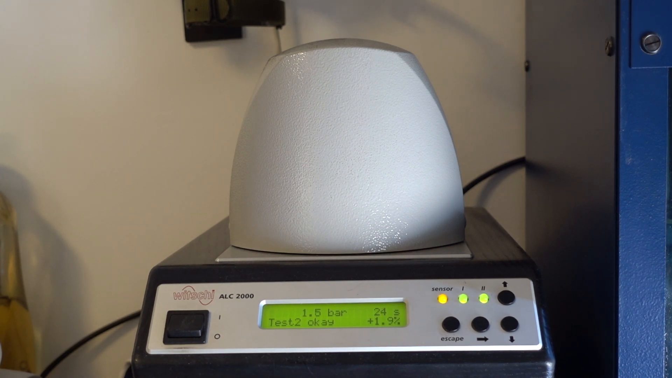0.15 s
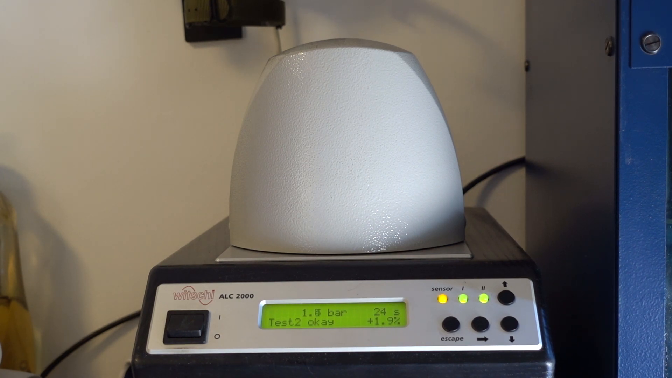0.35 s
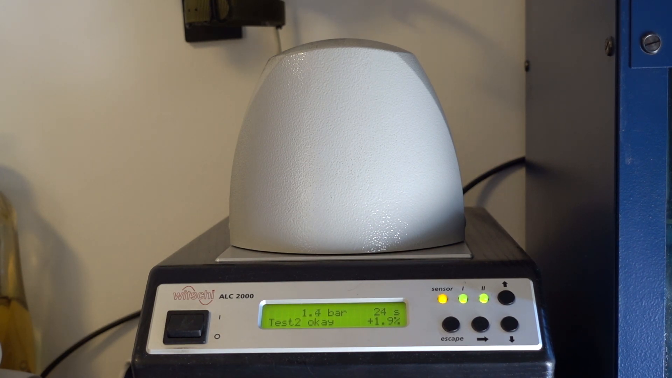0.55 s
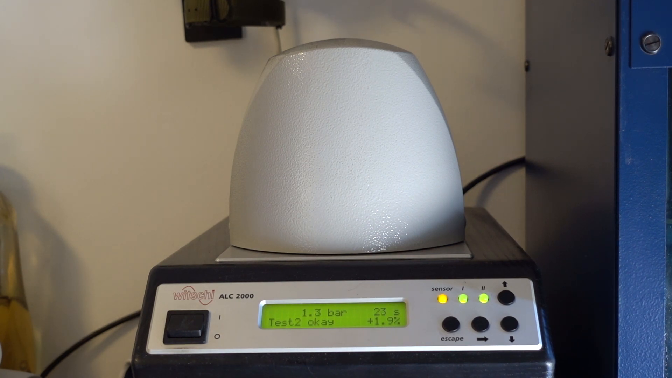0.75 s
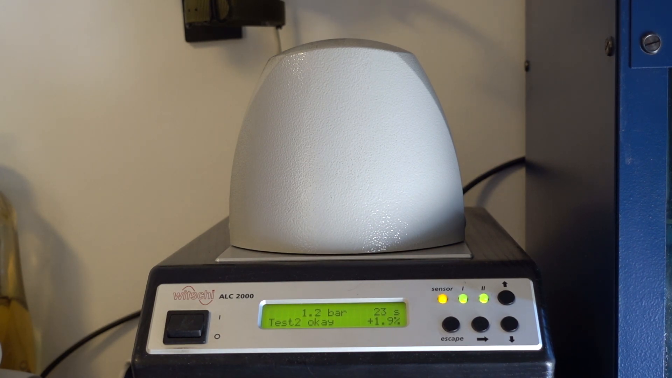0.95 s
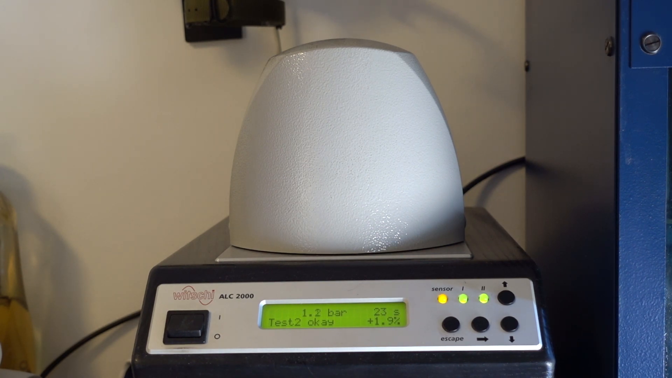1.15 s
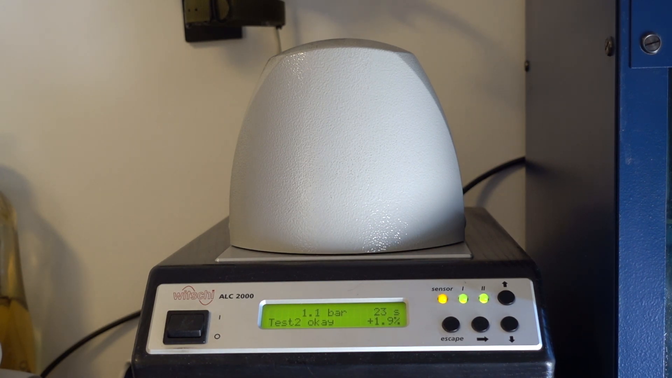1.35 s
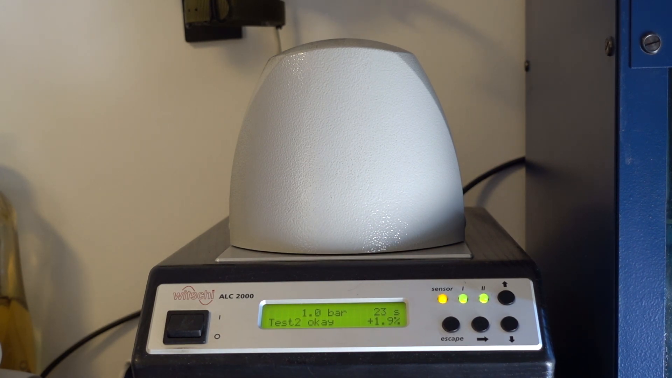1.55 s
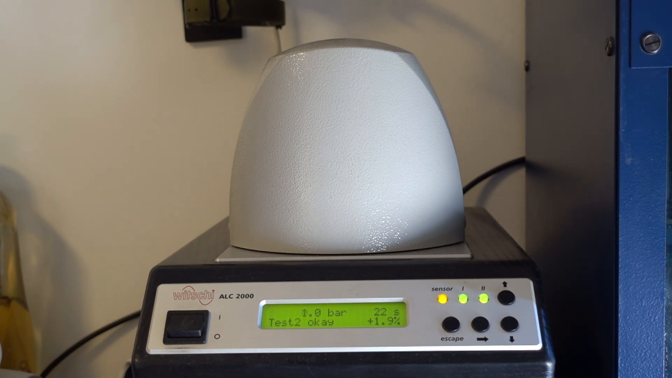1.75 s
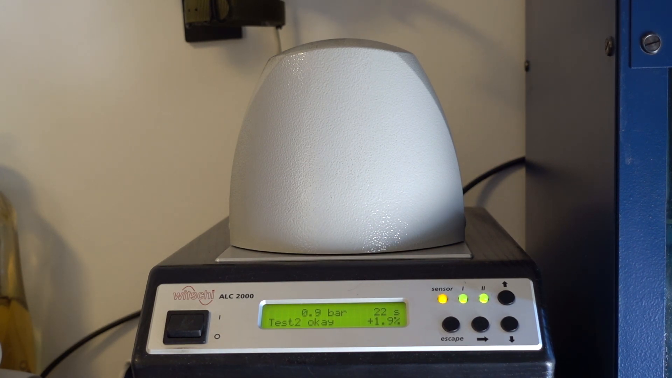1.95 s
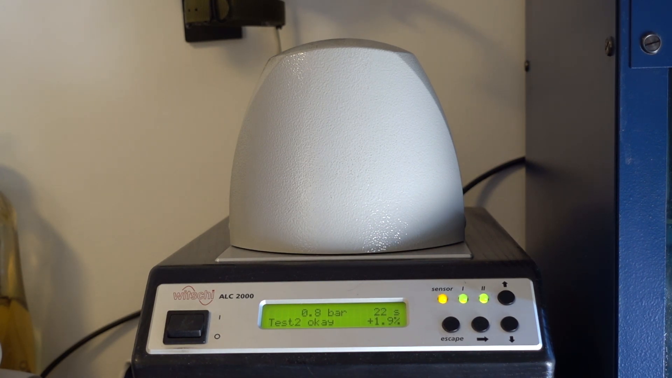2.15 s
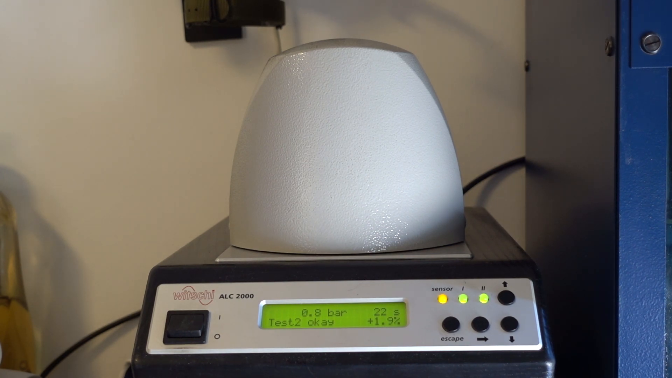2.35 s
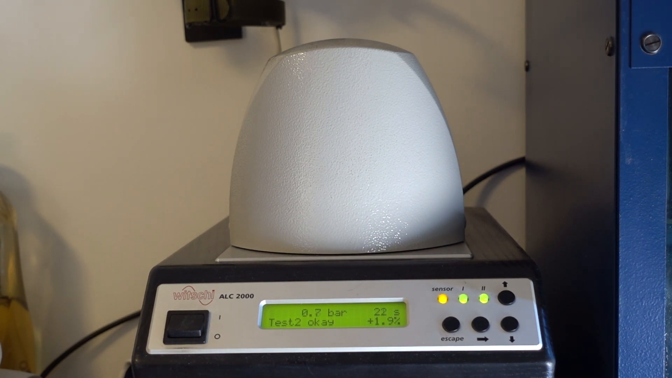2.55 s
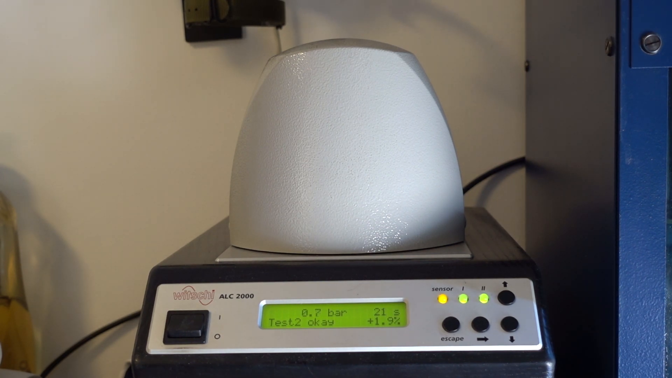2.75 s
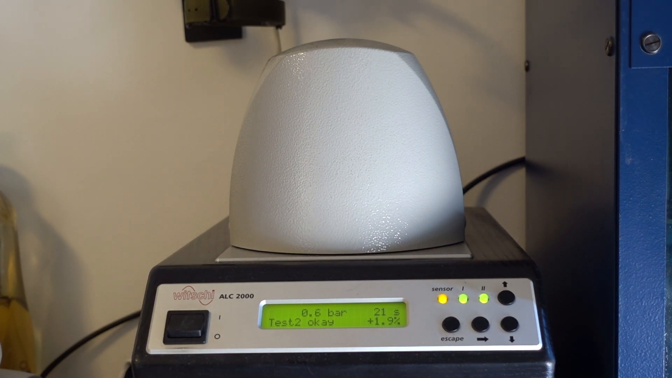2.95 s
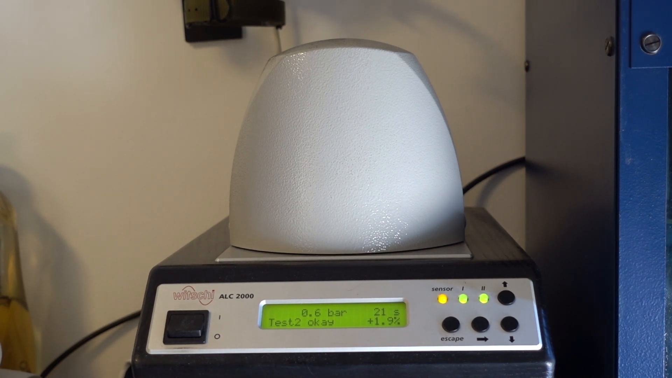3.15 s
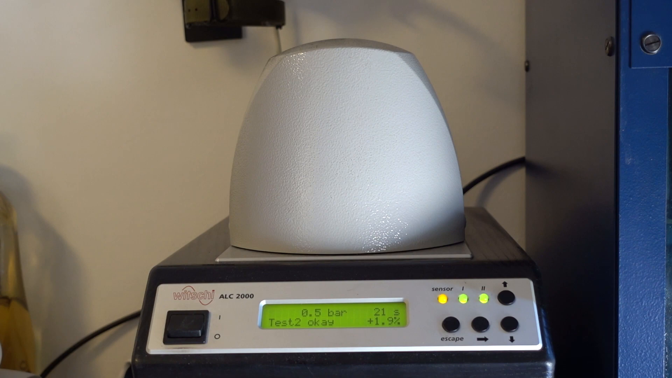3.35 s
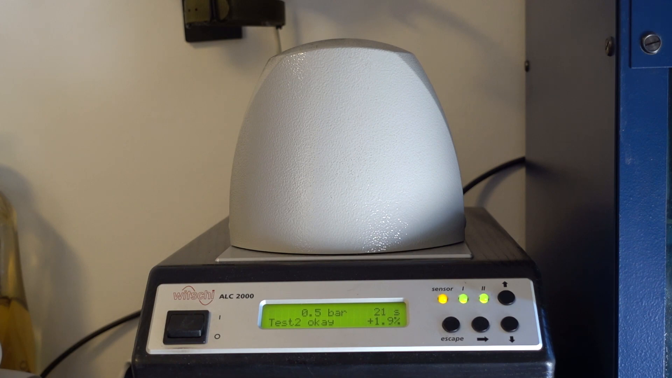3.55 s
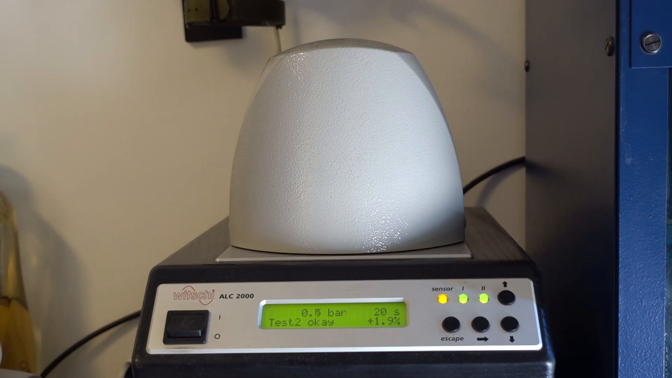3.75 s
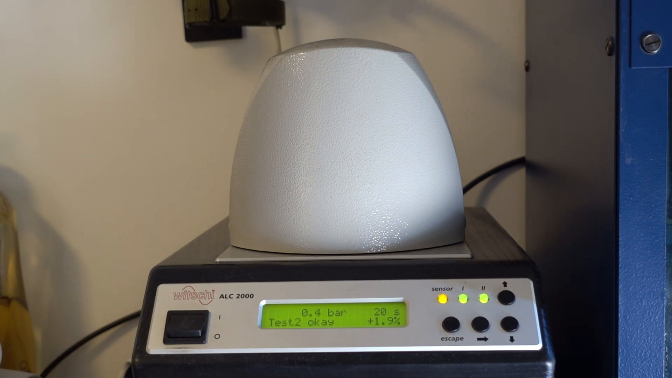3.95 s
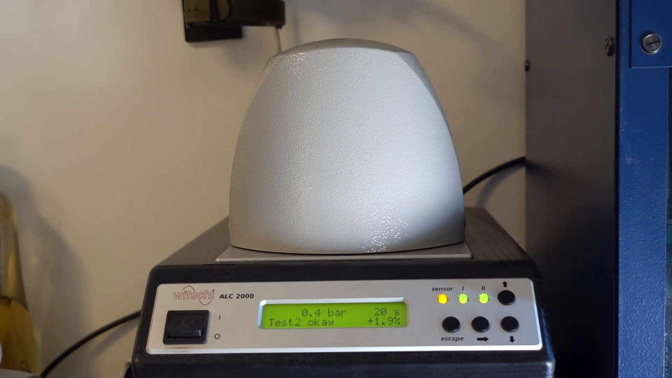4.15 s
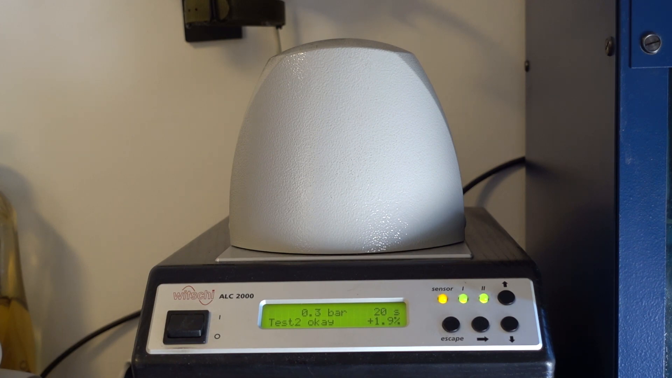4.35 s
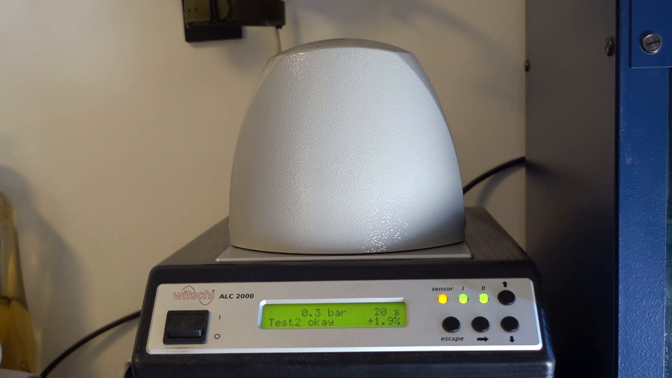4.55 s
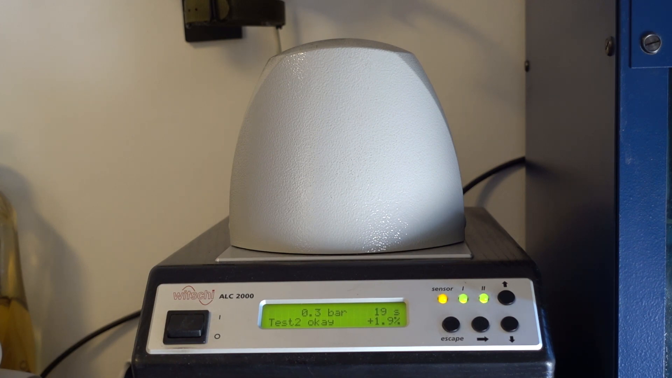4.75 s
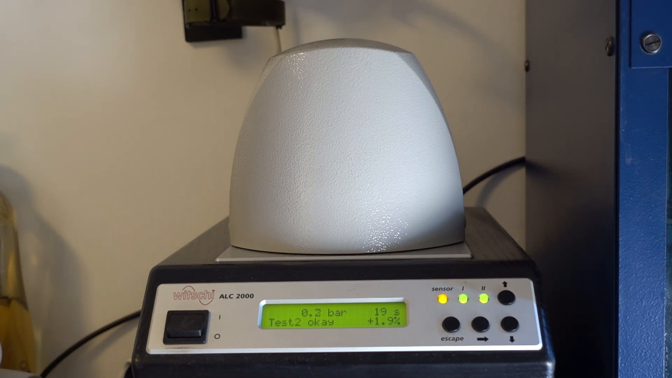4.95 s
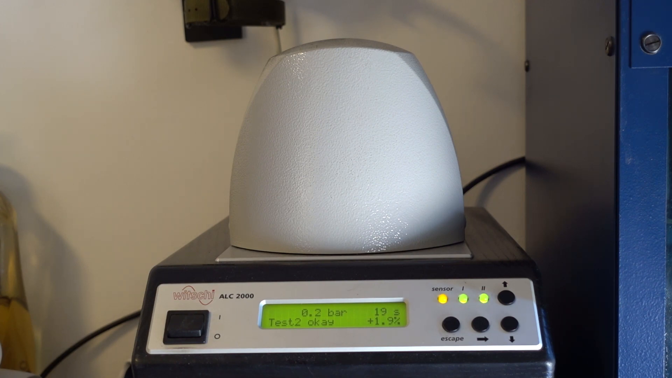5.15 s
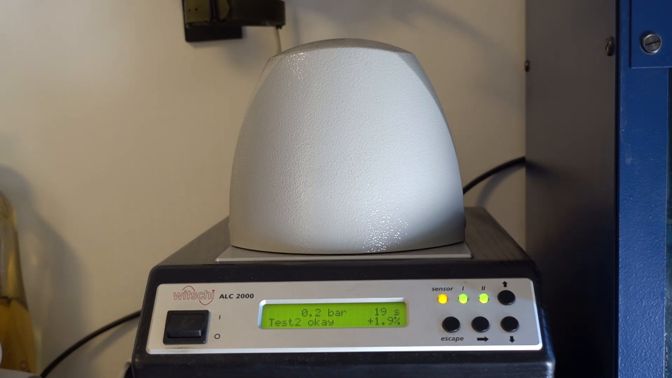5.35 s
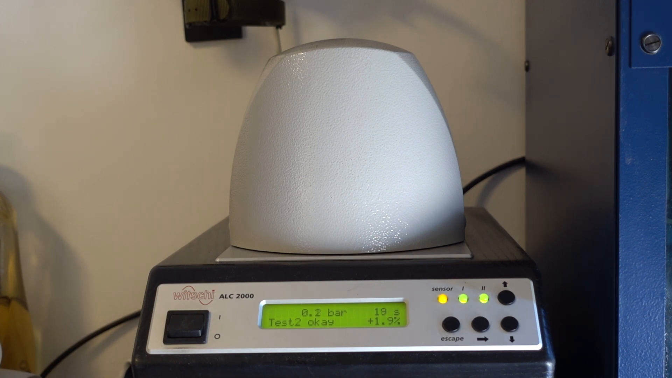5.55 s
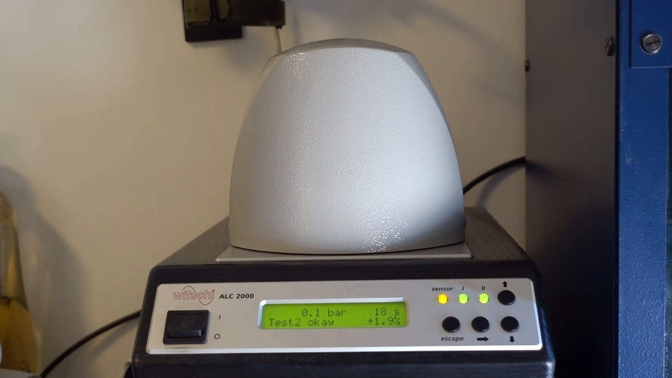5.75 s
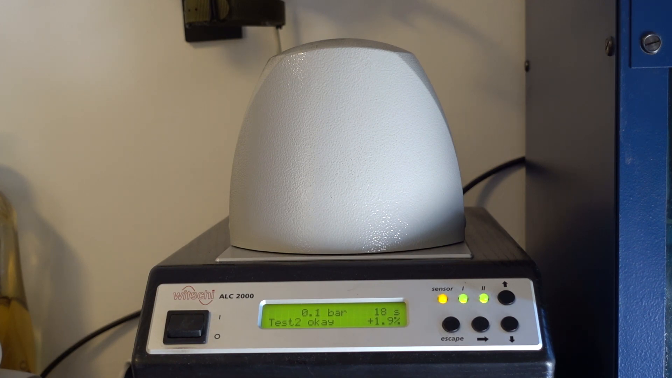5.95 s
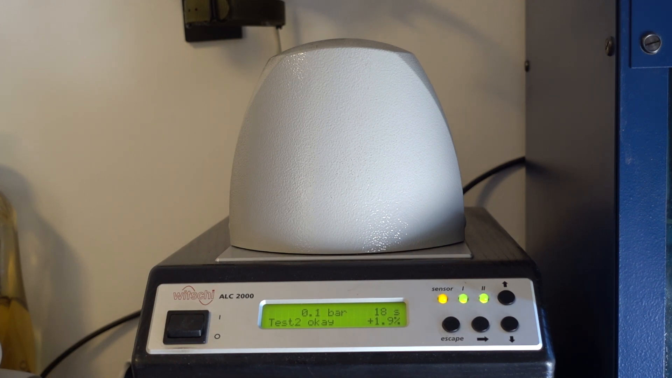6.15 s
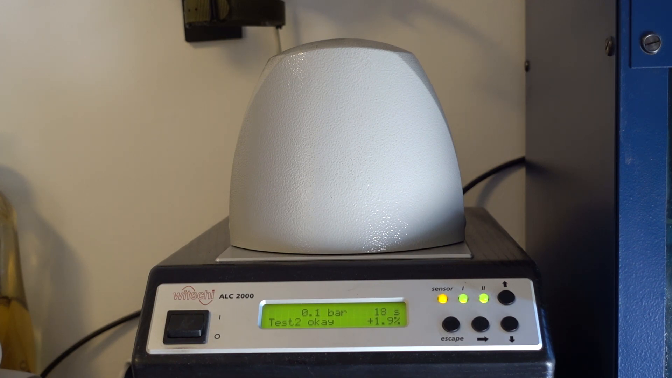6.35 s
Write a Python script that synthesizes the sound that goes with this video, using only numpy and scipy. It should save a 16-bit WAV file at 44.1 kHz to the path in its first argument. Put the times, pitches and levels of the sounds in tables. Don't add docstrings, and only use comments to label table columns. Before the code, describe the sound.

A steady, coloured jet of venting air fills the foreground in a small indoor workshop, heard in close stereo. Soft distant steps are nearly buried under it. Around halfway, a heavier step, a sole scuffing the floor, a short low squeak and brushing cloth. The jet loses its roar and thins away, uncovering harder wooden footfalls and faint room rumble, before one sharp valve click with a tiny rattle.

```python
import sys
import numpy as np
from scipy import signal
from scipy.fft import rfft, irfft, next_fast_len
from scipy.io import wavfile

SR = 44100
rng = np.random.default_rng(int(sys.argv[2]) if len(sys.argv) > 2 else 0)


def wav_out(sig):
    wavfile.write(sys.argv[1], SR, np.round(np.clip(np.atleast_2d(sig).T, -1, 1) * 32767).astype(np.int16))


def how_loud(loudness_db):
    steps = np.asarray(loudness_db, float) / 20
    return 10 ** steps


N = 286605
SIZE = next_fast_len(N + SR)
HZ = np.maximum(np.fft.rfftfreq(SIZE, 1 / SR), 1)
TIME = np.arange(N) / SR

# (time [s], level [dB])
JET_LEVEL = [
    (0, -33),
    (1, -33),
    (2, -34),
    (3.1, -35),
    (3.7, -37.5),
    (4.3, -40),
    (5.2, -46.5),
    (5.8, -51),
    (6.5, -56.5),
]
# (frequency [Hz], low share [dB/dB], hiss share [dB/dB])
JET_BANDS = [(300, 0.38, 0.46), (726, 1.7, 0.38), (1400, 1.3, 0.42), (1920, 1.14, 0.0), (2460, 0.0, 0.13),
             (3270, 0.021, 0.62), (4560, 0.44, 1.84), (7120, 0.71, 0.83), (9500, 0.0, 0.77),
             (13000, 0.0, 0.87)]
# (frequency [Hz], level [dB])
JET_REACH = [(100, -42), (250, -16), (400, -6.5), (490, 0.5), (14000, 0), (15000, -9.5), (15600, -30)]
# (frequency [Hz], width [Hz], level [dB], left minus right
# [dB])
HOUSING_MODES = [(503.6, 47, -15.5, -2.5), (588, 134, -15.5, -1), (659.6, 36, -12, -1.5), (717, 40, -15, 1),
                 (916, 82, -10, -1.5), (1026, 77, -24.5, 16), (1246, 16.6, -12.5, -10.5),
                 (1330, 37, -18, 10), (1399, 98, -7, 0.5), (1518, 83, -5, -2), (1594, 12.3, -7.5, -25),
                 (1674, 40, -2.5, -1), (1747.5, 23, -1.9, 12), (1789, 24, -4, -11.5), (1889, 59, 2.5, -3),
                 (2050, 98, -3, -4.5), (2338, 143, 4, -2), (2412, 25, -5, 18.5), (2511, 90, 1.4, -5.5),
                 (2520, 16, 5.5, 10), (2713, 83, 4.5, -2.5), (2730, 84, -10.5, -8), (2970, 85, -7, 0),
                 (3133, 78, -2, 9), (3257, 41, -6.5, 16.5), (3366, 64, -4, -8), (3530, 26, -12.5, -3),
                 (3590, 85, -26, -8), (3710, 140, -10.5, -6), (3904, 95, -35, 0),
                 (980, 22, -19, -3), (1423, 14, -6.5, -13.5), (1529, 21, -1.5, 4.5), (2050, 18, -1, 1),
               (2300, 25, -7, -4), (2241, 26, 3, -2), (2340, 36, 1, 6), (2490, 14, -7, 3), (2842, 21, 0, 1),
               (3043, 22, -5, 8), (3140, 22, -7, 4), (3050, 22, -10, 8), (3660, 34, -8.5, -2),
               (3780, 20, -17, -4)]
# (frequency [Hz], width [Hz], level [dB], left minus right [dB])
OUTLET_MODES = [(4360, 750, -10.5, 1), (4730, 58, -8.5, 2), (5030, 370, -13, 3.5), (5380, 135, -10, -1.6),
                (5430, 130, -14, -0.5), (5720, 78, -14, 1), (6010, 620, -9.5, -0.8), (6400, 100, -15, 14),
                (6690, 136, -11, 8), (6960, 320, -13, -5), (7260, 340, -15.5, 4.5), (7440, 212, -22.0, -4),
                (7930, 74, -16.5, 7), (8060, 340, -16, 0), (8500, 250, -14.5, 0), (8855, 117, -30, 7),
                (9120, 510, -22, -1), (9541, 173, -21, 0), (9940, 200, -21, -12), (10680, 610, -15, 3),
                (10930, 72, -8, 2.5), (11550, 470, -18.5, 6), (12270, 207, -24.5, 1.2),
                (11800, 113, -19, 7), (12318, 347, -23, 6), (12670, 236, -14.5, -6), (12962, 45, -31, -4),
                (13500, 591, -14.5, 4), (13814, 185, -22, 6), (14500, 1300, -18.5, -9)]
# (frequency [Hz], power common to both ears [0-1], power that differs [0-1])
WALL_SHARE = [(100, .005, .02), (200, .005, .003), (400, .005, .018), (700, .004, .04), (1300, .003, .065),
              (2400, .003, .075), (3300, .04, .22), (4400, .25, .36), (9000, .22, .36), (12500, .06, .37),
              (15000, .12, .4)]
# (frequency [Hz], density [dB per Hz])
ROOM_TONE = [(30, -50), (70, -41), (130, -24.5), (180, -22), (260, -1.5), (330, -3.5), (450, -2),
             (1500, -11), (6000, -20), (14000, -26), (15500, -42)]
# (time [s], level [dB], brightness [dB per octave], softness [0-1])
STEPS = [
    (.705, -56.5, 3, 0.44),
    (0.889, -59, 3.5, 0.7),
    (1.944, -58.5, 2, 0.3),
    (2.776, -47.5, 1.2, .95),
    (3.717, -46, 0, 0.13),
    (4.178, -49.5, 0, 0),
    (4.785, -53.5, -2, .05),
    (5.356, -58, 1, 0.2),
]
# (frequency [Hz], density [dB per Hz])
FLOOR_COLOUR = [(30, -46), (60, -29), (110, -17), (200, -6.5), (280, 2), (390, 7.5), (500, -6), (720, 5),
                (900, 0), (1100, -6), (1350, -6), (2000, -24), (4000, -29)]
# (frequency [Hz], level [dB], T60 [s])
BOARD_MODES = [(141, -20, .25), (267, -12, 0.21), (327, -8.5, 0.15), (393, -3.5, 0.29), (567, -15, .15),
               (720, -0.5, 0.26), (890, -9, 0.14), (1098, 2, 0.2)]
# (frequency [Hz], density [dB per Hz])
SLIDE_COLOUR = [(100, -50), (300, -12), (1200, 4.5), (2500, -5), (3300, 13), (3900, 13), (4700, 8),
                (5500, 0), (8000, -3), (14500, -22), (16000, -40)]
# (time [s], level [dB], T60 [s])
SWISHES = [
    (2.795, -39.5, .3),
    (4.984, -46, .17),
    (5.015, -55, .18),
    (5.975, -62, .2),
]
# (frequency [Hz], density [dB per Hz])
SWISH_COLOUR = [(2000, -27), (4000, 4), (6500, 1), (9500, -2), (13000, 0), (15700, -2)]
# (frequency [Hz], level [dB])
PIN_MODES = [(4300, -7), (6300, 0), (8600, -3), (11000, -6), (13000, -12), (15300, -7)]


def rms_one(x):
    return x / np.sqrt(np.mean(np.abs(x) ** 2) + 1e-20)


def at_hz(points, hz, column=1):
    points = np.array(points)
    return np.interp(np.log(hz), np.log(points[:, 0]), points[:, column])


def coloured(spectrum, slope_db=0):
    gain = how_loud(at_hz(spectrum, HZ) + slope_db * np.log2(HZ / 400))
    return rms_one(irfft(rfft(rng.standard_normal(SIZE)) * gain, SIZE)[:N])


def burst(start_s, rise_s, t60_s):
    t = np.maximum(TIME - start_s, 0)
    return (1 - np.exp(-t / rise_s)) * how_loud(-60 * t / t60_s)


def drift(rate_hz):
    knots = np.arange(0, 8, 1 / rate_hz)
    return np.interp(TIME, knots, rng.standard_normal(len(knots)))


def room():
    t60_s = 0.28
    wash = rng.standard_normal((2, SR)) * how_loud(-60 * TIME[:SR] / t60_s)
    common, differing = rms_one(rfft(wash, SIZE))
    shares = np.clip([at_hz(WALL_SHARE, HZ, 1), at_hz(WALL_SHARE, HZ, 2)], 0, .5)
    middle = np.sqrt(1 - shares.sum(axis=0)) + np.sqrt(shares[0]) * common
    return middle + np.sqrt(shares[1]) * differing * [[1], [-1]]


def flow():
    choked_until_s, choke_soft_s = 3, 0.32
    level_db = np.interp(TIME, *np.transpose(JET_LEVEL))
    fading_db = level_db - level_db[0]
    shock = np.logaddexp(0, (choked_until_s - TIME) / choke_soft_s)
    shock = shock / shock[0]
    low_db = .3 + 1.42 * shock + np.minimum(-0.41 * fading_db, 5.5)
    hiss_db = -6.5 + 7.5 * shock - .15 * fading_db
    return level_db, low_db, hiss_db


def resonances():
    power = np.zeros((2, len(HZ)))
    for hz, width_hz, level_db, pan_db in HOUSING_MODES + OUTLET_MODES:
        bell = (1 + (2 * (HZ - hz) / width_hz) ** 2) ** -1.5
        ears_db = [level_db + pan_db / 2, level_db - pan_db / 2]
        power += np.outer(how_loud(ears_db) ** 2, bell)
    return np.sqrt(power) * how_loud(at_hz(JET_REACH, HZ))


def jet(path):
    flutter_db = .5
    level_db, low_db, hiss_db = flow()
    white = rfft(rng.standard_normal(SIZE))
    source = np.zeros(N)
    centres = np.log(np.array(JET_BANDS)[:, 0])
    for k, (_, low, hiss) in enumerate(JET_BANDS):
        band = np.interp(np.log(HZ), centres, np.arange(len(centres)) == k)
        band_db = low * low_db + hiss * hiss_db + flutter_db * drift(14)
        source += irfft(white * band, SIZE)[:N] * how_loud(band_db)
    lead_in = how_loud(level_db[0]) * source[:SR // 2]
    gap = np.zeros(SIZE - N - len(lead_in))
    blown = np.concatenate([source * how_loud(level_db), gap, lead_in])
    return how_loud(13.5) * irfft(rfft(blown) * resonances() * path, SIZE)[:, :N]


def room_tone():
    return how_loud(-71 + 2.9 * drift(6.2)) * coloured(ROOM_TONE)


def steps():
    out = np.zeros(N)
    for start_s, level_db, slope_db, soft in STEPS:
        rise_s = 0.0039 + soft ** 2 * (.03 - 0.0039)
        t60_s = 0.4 + soft * (1 - 0.4)
        last_tap = start_s == STEPS[-1][0]
        heel = burst(start_s, rise_s, 0.076 if last_tap else t60_s)
        out += how_loud(level_db) * heel * coloured(FLOOR_COLOUR, slope_db)
        if last_tap:
            continue
        toe_s = start_s + .055 + soft * (0.056 - .055)
        toe_db = level_db - 8.5 + 7.5 * soft
        toe = burst(toe_s, 2 * rise_s, t60_s)
        out += how_loud(toe_db) * toe * coloured(FLOOR_COLOUR, slope_db - 1)
    return out * how_loud(2 * drift(35))


def knocks():
    out = np.zeros(N)
    t = TIME[:SR // 2]
    luck = rng.standard_normal((len(STEPS), len(BOARD_MODES)))
    for (start_s, level_db, slope_db, soft), chances in zip(STEPS, luck):
        rings = np.zeros(len(t))
        for (hz, mode_db, t60_s), chance in zip(BOARD_MODES, chances):
            tilt_db = (slope_db + 0.5) * np.log2(hz / 400)
            ring_db = mode_db + tilt_db + 1.5 * chance - 60 * t / t60_s
            rings += how_loud(ring_db) * np.sin(2 * np.pi * hz * t + 9 * chance)
        heel_db = level_db - 3 - 8 * soft
        out[round(start_s * SR):][:len(t)] += how_loud(heel_db) * rings * (1 - np.exp(-t / 0.0038))
    return out


def slide():
    start_s, grip_s, press_s, let_go_t60_s = 2.775, 0.013, 0.22, 0.19
    t = np.maximum(TIME - start_s, 0)
    press_db = 7.5 * np.minimum(t / press_s, 1) ** 2
    let_go_db = -60 * np.maximum(t - press_s, 0) ** 2 / let_go_t60_s ** 2
    level_db = -46 + press_db + let_go_db + 1.5 * drift(45)
    return (1 - np.exp(-t / grip_s)) * how_loud(level_db) * coloured(SLIDE_COLOUR)


def squeak():
    start_s, length_s, edge_s = 2.985, .13, 0.017
    along = np.clip((TIME - start_s) / length_s, 0, 1)
    edges = np.clip(np.minimum(along, 1 - along) * length_s / edge_s, 0, 1) ** 2
    pitch_hz = 482 - 137.5 * along ** 1.44
    phase = 2 * np.pi * np.cumsum(pitch_hz * (1 + .03 * drift(45))) / SR
    tone = np.sin(phase) + 0.34 * np.sin(2 * phase) + 0.31 * np.sin(3 * phase)
    level_db = -50.5 - 9 * np.abs(along - 0.65) + 2.5 * drift(48)
    return edges * how_loud(level_db) * tone


def swishes():
    strokes = sum(how_loud(level_db) * burst(start_s, .006, t60_s) for start_s, level_db, t60_s in SWISHES)
    return coloured(SWISH_COLOUR) * strokes


def valve():
    start_s, rattle_t60_s = 6.3241, .05
    t = np.maximum(TIME - start_s, 0)
    swell = t / 0.00021 * np.exp(1 - t / 0.00019)
    pin = sum(how_loud(level_db) * np.cos(2 * np.pi * hz * (t - .0003)) for hz, level_db in PIN_MODES)
    snap = how_loud(-37) * swell * pin
    jolt = how_loud(-82) * burst(start_s, .003, rattle_t60_s * 2) * np.sin(2 * np.pi * 75 * t)
    rattle = how_loud(-51) * burst(start_s, 0.0025, rattle_t60_s) * coloured(SWISH_COLOUR)
    return snap + jolt + rattle


def scene():
    path = room()
    hiss = jet(path)
    distant = room_tone() + steps() + knocks() + slide() + squeak() + swishes()
    around = irfft(rfft(distant, SIZE) * path, SIZE)[:, :N]
    return hiss + around + valve() * how_loud([[.3], [-.3]])


def top_cut(x):
    return signal.sosfilt(signal.butter(12, 15900, fs=SR, output="sos"), x)


def record(dry):
    bass_cut = signal.butter(2, 40, "high", fs=SR, output="sos")
    mix = signal.sosfilt(bass_cut, dry)
    return top_cut(mix)


dry = scene()
out = record(dry)
wav_out(out)
```